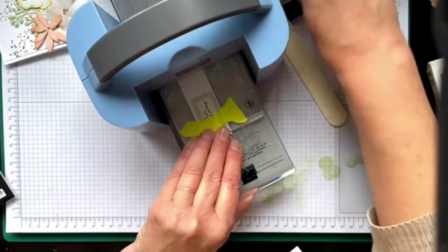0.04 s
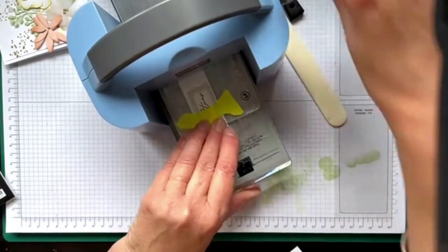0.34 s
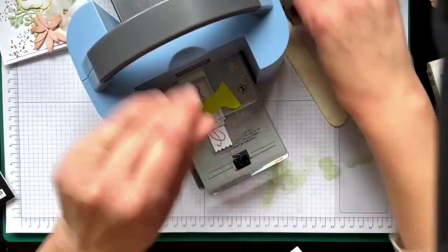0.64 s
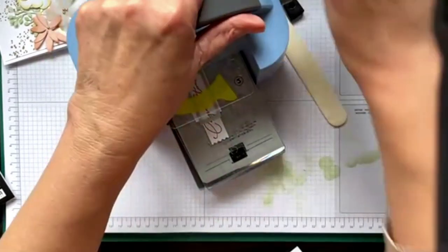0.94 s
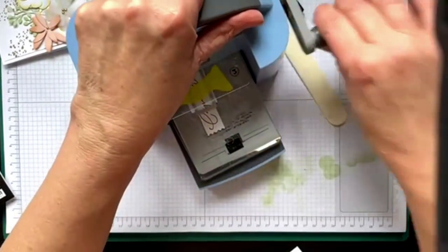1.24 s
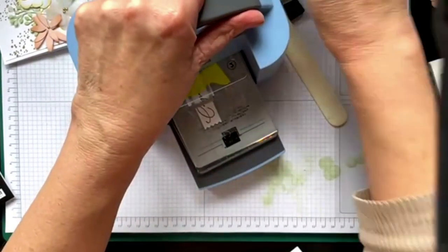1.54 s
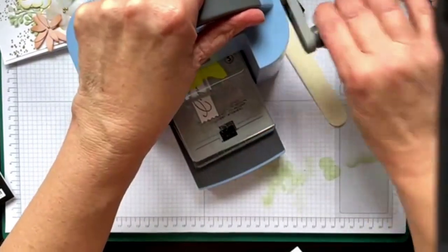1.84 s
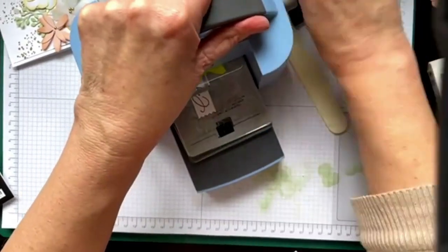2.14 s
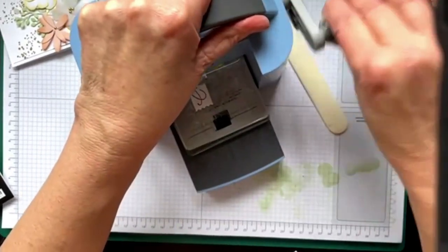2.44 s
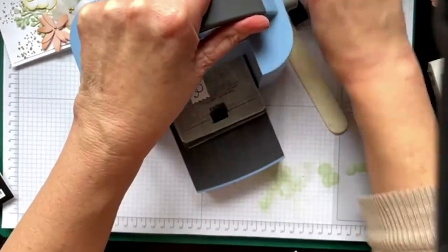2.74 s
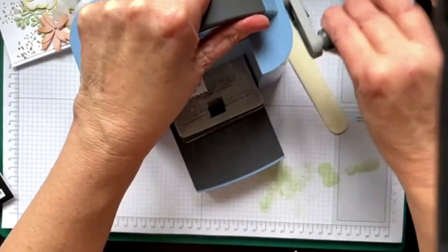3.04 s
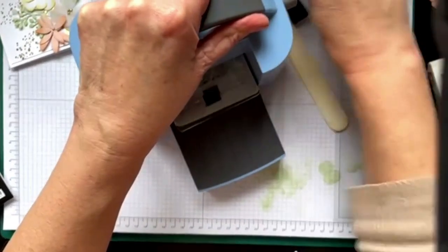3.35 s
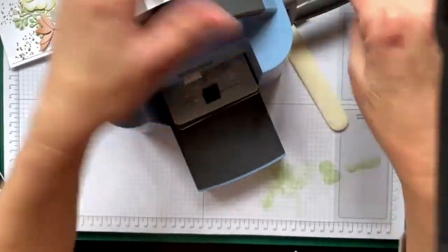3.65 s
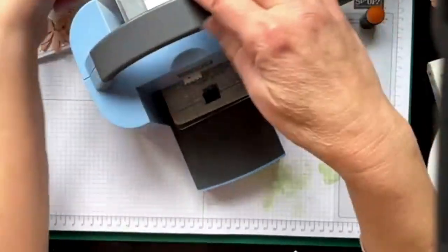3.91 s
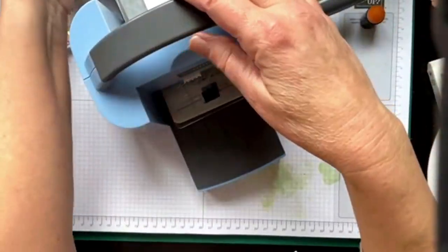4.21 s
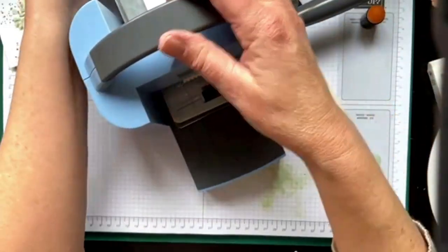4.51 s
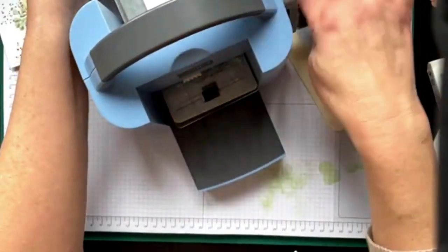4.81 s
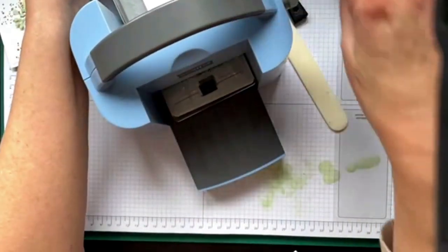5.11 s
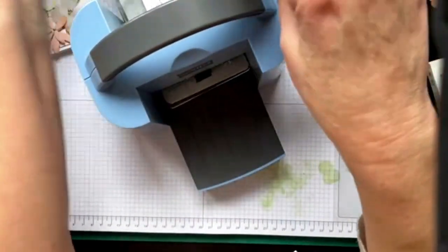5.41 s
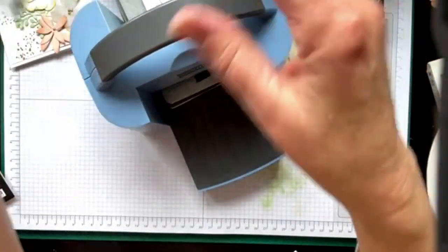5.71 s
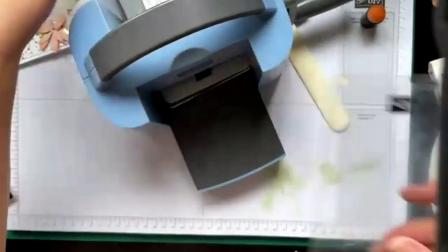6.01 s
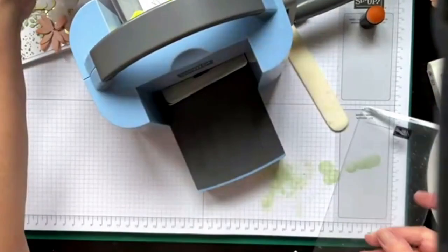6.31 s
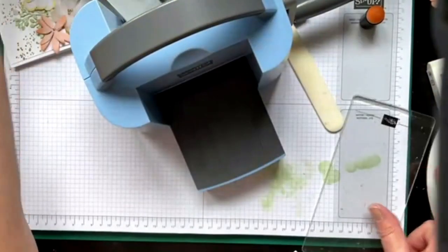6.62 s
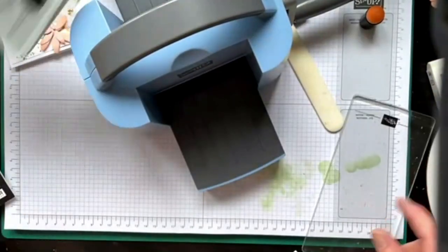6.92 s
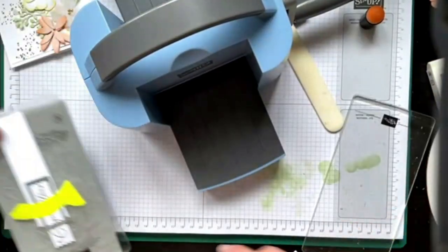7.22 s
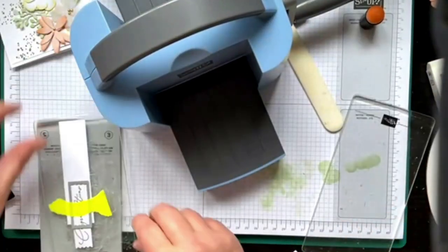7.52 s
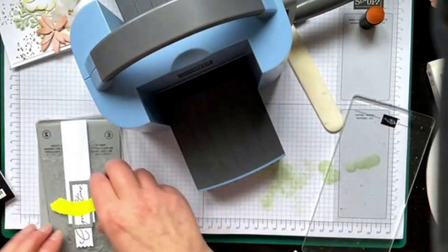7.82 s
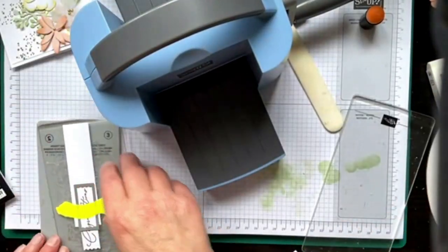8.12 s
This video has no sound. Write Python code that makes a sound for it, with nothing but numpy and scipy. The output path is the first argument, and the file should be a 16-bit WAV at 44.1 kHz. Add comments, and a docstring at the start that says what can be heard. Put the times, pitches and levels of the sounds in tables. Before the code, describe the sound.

Low grinding and knocking from a hand-turned die cutter ends in a loud clack, followed by plastic plates rattling, sliding and dropping close by.

```python
"""Low lurches, a clicking crank and knocking gears: a hand-cranked die-cutter grinds a plate sandwich
through its rollers on a craft table. The rollers snap shut behind it, a steel die ticks, and the loose
plates rattle out of the slot. A clear plate is slid onto the mat and the base plate dropped beside it.
Each blow is a crack plus the struck object's modes; the friction is mostly a stream of tiny slips.
Heard in a small room, close up, on a near-mono microphone."""
import sys
import numpy as np
from scipy import signal
from scipy.fft import rfft, irfft, next_fast_len
from scipy.io import wavfile
from scipy.ndimage import uniform_filter1d, map_coordinates

SR = 44100
rng = np.random.default_rng(int(sys.argv[2]) if len(sys.argv) > 2 else 0)


def log_audio(samples):
    """Write samples as a 16-bit WAV file to the path given in sys.argv[1]."""
    # one column per channel
    frames = np.atleast_2d(samples).T
    # limit to full scale, then quantise
    limited = np.clip(frames, -1, 1)
    pcm = np.round(limited * 32767).astype(np.int16)
    wavfile.write(sys.argv[1], SR, pcm)


N = 359591
TIME = np.arange(N) / SR
RING_TIME = np.arange(SR // 5) / SR

# Modes of the machine's housing and of the clear plate: f/Hz, level/dB, t60/s
HOUSING_MODES = [(184.6, -13, 0.1), (476.8, -12.5, 0.045), (544, -13.5, 0.11), (672, -11, 0.2),
                 (800, -11.5, 0.13), (1420, -7, 0.1), (1640, -13.5, 0.057), (2350, -18, 0.061),
                 (4465, -12.5, 0.048)]
CLEAR_PLATE_MODES = [(655, -4, 0.062), (713, -26, .15), (1017, -5, 0.082), (1246, -3.5, 0.088),
                     (1987, -8, 0.088), (4320, -18.5, 0.11)]
# Spectrum of gear teeth in contact: f/Hz, level/dB
GEAR_SPECTRUM = [(76, -30), (130, -8), (344, -12), (512, -2), (967, -10.5), (1250, -6), (2180, -11),
                 (2610, -8.5), (3250, -20.5), (6260, -19.5), (15000, -44)]


def amp(db):
    """Decibels to gain."""
    return 10 ** (np.asarray(db) / 20)


def unit(x):
    """x at rms 1."""
    return x / np.sqrt(np.mean(x ** 2) + 1e-20)


def onset_unit(x):
    """x with rms 1 over its first 8 ms."""
    return x / np.sqrt(np.mean(x[:SR // 125] ** 2))


def along(points, hz):
    """A curve of (f/Hz, value) points, read on a log frequency axis."""
    knot_hz, values = np.transpose(points)
    return np.interp(np.log(hz + 1), np.log(knot_hz + 1), values)


def wobble(knots_per_s):
    """A smooth random curve."""
    knots = rng.standard_normal(int(N * knots_per_s / SR) + 4)
    return map_coordinates(knots, [TIME * knots_per_s])


def fade(t60, t=RING_TIME):
    """Exponential decay, 60 dB down after t60 seconds."""
    return amp(-60 * t / t60)


def add(track, s, sound):
    """Mix a sound into the track from second s."""
    part = track[max(round(s * SR), 0):][:len(sound)]
    part += sound[:len(part)]


def coloured(x, colour=((1, 0),), tilt_db=0):
    """x through a causal filter: a spectrum, tilted by tilt_db per octave about 2 kHz."""
    size = 2 * next_fast_len(len(x) // 2 + 2048)
    hz = np.fft.rfftfreq(size, 1 / SR)
    db = along(colour, hz) + tilt_db * np.log2(np.clip(hz, 400, 10000) / 2000)
    cepstrum = irfft(np.log(np.maximum(amp(db), 1e-6)))
    cepstrum[1:size // 2] *= 2  # folded for minimum phase
    cepstrum[size // 2 + 1:] = 0
    return irfft(rfft(x, size) * np.exp(rfft(cepstrum)))[:len(x)]


def noise(colour):
    """Coloured noise of rms 1."""
    return unit(coloured(rng.standard_normal(N), colour))


def patchy(x, depth_db):
    """x with its colour drifting in small patches of time and frequency; rms 1."""
    spectra = signal.stft(x, nperseg=512)[2]
    patches = uniform_filter1d(rng.standard_normal(spectra.shape), size=7, axis=0)
    patches = uniform_filter1d(patches, size=12, axis=1)
    return unit(signal.istft(spectra * amp(depth_db * unit(patches)), nperseg=512)[1][:N])


def grains(per_s, spread_db, t60):
    """Tiny slips at random moments, of uneven size, each a short burst; rms 1."""
    slips = (rng.random(N) < per_s / SR) * amp(spread_db * (2 * rng.random(N) - 1))
    power = np.abs(signal.fftconvolve(slips ** 2, fade(t60) ** 2)[:N])
    return unit(np.sqrt(power) * rng.standard_normal(N))


def ring(modes, t=RING_TIME):
    """Damped modes, each struck with a new strength and sign."""
    hz, db, t60 = np.transpose(modes)[:, :, None]
    strength = amp(db + 2 * rng.standard_normal(hz.shape)) * rng.choice([-1, 1], hz.shape)
    return np.sum(strength * np.sin(2 * np.pi * hz * t) * fade(t60, t), axis=0)


def spot_colour(colour, depth_db):
    """Each contact point favours other parts of the body's spectrum."""
    hz = np.geomspace(60, 16000, 48)
    return np.column_stack([hz, along(colour, hz) + depth_db * rng.standard_normal(len(hz))])


def blows(rows, colour, modes, crack_t60, body_db, body_t60, ring_db, settle_t60):
    """Each blow: a crack, a duller dense ring of the whole body, and its few clear modes."""
    track = np.zeros(N)
    for s, db, tilt_db in rows:
        crack, body = rng.standard_normal((2, len(RING_TIME)))
        body = unit(signal.lfilter([1], [1, -0.3], body))
        burst = crack * fade(crack_t60) + amp(body_db) * body * fade(body_t60)
        contact = onset_unit(coloured(burst, spot_colour(colour, depth_db=2.5)))
        # light touches build up more slowly than hard ones
        onset = 1 - fade(settle_t60 * amp(-(db + 40) / 2))
        sound = (contact + amp(ring_db) * ring(modes)) * onset
        add(track, s, amp(db) * onset_unit(coloured(sound, tilt_db=tilt_db)))
    return track


def booms(rows, modes, rise_s):
    """Low modes that swell softly after each push."""
    t = np.arange(SR // 2) / SR
    track = np.zeros(N)
    for s, db in rows:
        boom = ring(modes, t) * (1 - fade(rise_s, t)) ** 2
        add(track, s - 0.005, amp(db) * boom / np.abs(boom).max())
    return track


def strokes(rows, friction):
    """Swells of a friction sound, each with its own length, level and brightness."""
    track = np.zeros(N)
    for s, length, db, tilt_db in rows:
        shape = np.hanning(round(2 * length * SR)) ** 2
        stroke = friction[round((s - length) * SR):][:len(shape)]
        add(track, s - length, amp(db) * shape * unit(coloured(stroke, tilt_db=tilt_db)))
    return track


def crank_arm(lag_s=0, turns_hz=2.2, farthest_out_s=0.55):
    """Position of the cranking arm, swinging between 1 and -1 once a turn."""
    return np.cos(2 * np.pi * turns_hz * (TIME - farthest_out_s - lag_s))


def loaded(release_s=3.17, let_go_s=0.044):
    """1 while the plates are between the rollers, 0 once they are through."""
    return np.clip((release_s - TIME) / let_go_s + 1, 0, 1)


def room_tone():
    """Still room air and mains hum."""
    # Hum partials and the spectrum of the air: f/Hz, level/dB
    partials = [(50, -67.5), (100, -66), (150, -78.5), (200, -78.5), (300, -84)]
    air = [(25, -6), (60, -11), (130, -12.5), (300, -18), (900, -22.5), (2000, -24.5), (4000, -32),
           (15000, -34), (16400, -42)]
    hum = sum(amp(db) * np.sqrt(2) * np.sin(2 * np.pi * (hz * TIME + rng.random()))
              for hz, db in partials)
    return hum + amp(-68.5) * noise(air)


def lurches():
    """The machine rocks on its feet each time the rollers catch."""
    catches = [(0.0, -37.5), (0.215, -35.5), (0.49, -47), (0.794, -37.5), (0.94, -37), (1.245, -40.5),
               (1.43, -42.5), (1.795, -38), (2.114, -38), (2.545, -42), (2.98, -43.5)]  # t/s, peak level/dB
    rocking = [(50.7, -8, 0.35), (84.3, -2.5, 0.37)]  # f/Hz, level/dB, t60/s
    return booms(catches, rocking, rise_s=0.023)


def rollers(bite_db=7.5, bite_s=0.361, swing_db=-1.46, spin_peak_s=5.1):
    """The rollers rumble, creak and grind in small slips under load, then spin on empty and duller."""
    # Spectra of the loaded rollers: f/Hz, level/dB
    grind = [(82, -33.5), (140, -3), (316, 1.5), (353, -9), (468, 5), (820, -4), (1150, -10.5),
             (1680, -16.5), (1820, -8), (4000, -28), (5200, -47), (8800, -120)]
    rumble = [(13, -33), (22, -13.5), (75, 4.5), (91, 1.5), (113, -17), (170, -17), (220, -43.5),
              (370, -120)]
    slips = patchy(coloured(grains(per_s=270, spread_db=2, t60=0.05), grind), depth_db=2.5)
    creaks = coloured(grains(per_s=22, spread_db=2, t60=0.06), GEAR_SPECTRUM, tilt_db=-3)
    creaks = patchy(creaks, depth_db=3.5)
    pressing = amp(-53.5) * noise(rumble) + amp(-59.5) * slips + amp(-62) * creaks
    strain_db = bite_db * np.exp(-TIME / bite_s) + swing_db * crank_arm()
    idle = unit(coloured(slips, [(300, -1), (600, -3.5), (1200, -9), (3500, -0.5)]))
    # spinning up at 73 dB/s, running down at 37 dB/s
    coast_db = -47.5 - np.maximum(73 * (spin_peak_s - TIME), 37 * (TIME - spin_peak_s))
    return loaded() * amp(strain_db) * pressing + amp(coast_db) * idle


def cranking_hiss(echo_ms=0.335, swing=0.056, waver=0.015, echo_share=0.2, swell_db=1.3):
    """A patchy friction hiss that swells once a turn, combed by its reflection off the circling arm."""
    spectrum = [(1060, -27.5), (1800, -4.5), (3160, -12.5), (5980, -6), (7390, -15), (11900, -11.5),
                (15200, -29), (16400, -37)]  # f/Hz, level/dB
    direct = noise(spectrum)
    delay_s = echo_ms / 1000 * (1 - swing * crank_arm() + waver * wobble(7))
    combed = direct + echo_share * map_coordinates(direct, [(TIME - delay_s) * SR])
    level_db = -63 + swell_db * crank_arm(lag_s=0.14) + 0.9 * wobble(11)
    return amp(level_db) * loaded() * patchy(combed, depth_db=2.5)


def crank_clicks():
    """The crank makes small hard contacts in its socket."""
    clicks = [(0.2305, -35, 0.5), (0.2668, -24.5, 1.7), (0.299, -42, -4), (0.4635, -47, -2.5)]  # t/s, level/dB, tilt/(dB/octave)
    spectrum = [(88, -39), (150, 0), (348, -20), (662, 3.5), (837, -14), (2270, 7.5), (2980, -13),
                (5150, -4), (5910, -28), (7180, -4.5), (11500, -43.5), (16000, -58.5)]  # f/Hz, level/dB
    modes = [(1100, -13.5, 0.078), (2260, -10, 0.016), (2530, -5.5, .025), (4000, -18, 0.026),
             (5180, 9, 0.0073), (7300, -24, 0.014)]  # f/Hz, level/dB, t60/s
    return blows(clicks, spectrum, modes, crack_t60=0.01,
                 body_db=-18.5, body_t60=0.043, ring_db=4.5, settle_t60=0.002)


def gear_knocks():
    """Gear teeth take up their play and ring the housing."""
    knocks = [(0.358, -38.5, -4), (0.425, -48, 1), (0.619, -42.5, 5.5), (0.63, -41.5, -6),
              (0.872, -47.5, -3.5), (0.905, -45.5, -6), (0.961, -41.5, 1.4), (1.034, -46, -8.5),
              (1.346, -51, -1.5), (1.425, -45.5, -7), (1.603, -48.5, -3.5), (1.647, -55.5, -6),
              (1.666, -45, -2), (2.235, -43.5, -5), (2.263, -43, -6), (2.391, -47, -1.8), (3.521, -42, 0.7),
              (3.839, -48, 0), (8.025, -49.5, -10)]  # t/s, level/dB, tilt/(dB/octave)
    return blows(knocks, GEAR_SPECTRUM, HOUSING_MODES, crack_t60=0.035,
                 body_db=-14.5, body_t60=0.094, ring_db=-1.5, settle_t60=0.0015)


def squeaks(width_hz=130):
    """The pressed plates stick briefly under the roller: faint, fuzzy, narrow tones."""
    sticks = [(0.533, 0.087, 2740, -64), (1.02, 0.13, 2590, -62.5), (1.405, 0.075, 2220, -61.5),
              (2.083, .1, 2840, -65)]  # t/s, length/s, f/Hz, level/dB
    fuzz = wobble(2 * width_hz)
    track = np.zeros(N)
    for s, length, hz, db in sticks:
        swell = np.exp(-np.pi * np.minimum(((TIME - s) / length) ** 2, 10))
        track += amp(db) * swell * unit(fuzz * np.sin(2 * np.pi * hz * TIME))
    return track


def rubs():
    """Skin and plastic brush over the housing in short grainy swells."""
    brushes = [(0.61, 0.052, -45, -4.5), (1.847, 0.1, -40.5, -0.5), (2.138, 0.057, -52, 4.5),
               (3.525, 0.099, -49.5, 2), (3.757, 0.041, -55.5, 0), (3.835, 0.065, -51.5, -0.5),
               (4.299, 0.17, -61, 3), (4.468, .09, -67, 10), (4.95, .16, -49, 1.5), (5.09, 0.17, -44.5, -1),
               (5.49, 0.084, -52, -8), (5.754, 0.04, -55.5, 3.5), (6.89, 0.077, -73, 8),
               (7.809, 0.059, -61.5, 0.5), (8.1, 0.049, -59, 3)]  # t/s, length/s, level/dB, tilt/(dB/octave)
    spectrum = [(120, -30), (200, -9.5), (551, -2.5), (796, -4), (1150, -0.5), (1630, -12.5), (2590, -9.5),
                (3350, -17), (13100, -26), (16400, -53)]  # f/Hz, level/dB
    friction = coloured(grains(per_s=880, spread_db=3, t60=0.023), spectrum)
    return strokes(brushes, patchy(friction, depth_db=4.5))


def roller_snap():
    """The rollers slam shut as the plates leave them, ringing the housing."""
    slams = [(3.1665, -26.5, 2.5), (3.172, -15.5, 1), (3.178, -34.5, 4), (3.193, -24, 0.45), (3.208, -9, 1),
             (3.2145, -19, 7), (3.2215, -19, 3.5), (3.227, -26.5, 2.5), (3.264, -34.5, 7.5),
             (3.279, -32.5, 1)]  # t/s, level/dB, tilt/(dB/octave)
    spectrum = [(65, -41.5), (110, -12), (186, -7.5), (403, -7.5), (665, 3), (950, -10.5), (1410, -5),
                (1850, -12), (2540, -10.5), (3260, -17.5), (4370, -16.5), (7230, -25.5), (12200, -26),
                (16400, -33)]  # f/Hz, level/dB
    return blows(slams, spectrum, HOUSING_MODES, crack_t60=0.024,
                 body_db=-11, body_t60=0.12, ring_db=-5, settle_t60=0.01)


def table_thumps():
    """The table top booms under each weight that lands on it."""
    landings = [(3.211, -22), (3.854, -40.5), (4.036, -41), (4.351, -46.5), (4.786, -34), (5.159, -33.5),
                (5.452, -37.5), (5.741, -47.5), (6.272, -39), (6.438, -34.5), (6.532, -41), (7.224, -29),
                (7.353, -36), (7.409, -31.5), (7.791, -51.5), (8.025, -51)]  # t/s, peak level/dB
    modes = [(48, -5, 0.52), (71.2, 3, 0.56), (81, -3, 0.47), (106, -19, 0.16)]  # f/Hz, level/dB, t60/s
    return booms(landings, modes, rise_s=0.099)


def die_ticks():
    """The steel die springs free with a short, high ring."""
    ticks = [(3.375, -21.5, 0.74), (3.391, -30.5, -5), (3.4188, -38.5, -2.5), (3.479, -49, -6.5)]  # t/s, level/dB, tilt/(dB/octave)
    spectrum = [(180, -26), (300, -16), (614, -12), (801, -16.5), (2570, -1), (3350, -10), (4670, 4),
                (6620, -25.5), (8500, -11), (16000, -32.5)]  # f/Hz, level/dB
    modes = [(2087, -11, 0.055), (2610, -5, 0.022), (4400, -7, .015), (6070, -6, 0.016), (8500, 1.5, 0.021),
             (11724, 3, 0.015)]  # f/Hz, level/dB, t60/s
    return blows(ticks, spectrum, modes, crack_t60=0.0095,
                 body_db=-29.5, body_t60=0.055, ring_db=3.5, settle_t60=0.003038)


def slot_rattle():
    """The loose plates knock about in the slot."""
    knocks = [(4.033, -29, 1.5), (4.435, -43, -5.5), (4.766, -44, -2), (4.796, -32, 1), (4.95, -33.5, 0),
              (4.961, -35, -1.5), (4.972, -38, 0.1), (5.0186, -35.5, 1), (5.03, -42.5, 12),
              (5.0576, -24, 2), (5.11, -39, -1.7), (5.144, -23, 4.5), (5.149, -34.5, 7),
              (5.154, -20.5, 7.5), (5.162, -22, 1), (5.198, -27.5, 5), (5.295, -42, 1.5), (5.386, -43, 0.2),
              (5.451, -48, -6), (5.65, -42, 3.5), (5.741, -53, -2.5)]  # t/s, level/dB, tilt/(dB/octave)
    spectrum = [(76, -49.5), (130, -7), (187, -22), (605, 1), (925, -8), (1250, -4.5), (1410, -1.5),
                (2390, -6), (4760, -5.5), (6850, -13), (8390, -17.5), (9860, -21.5), (11600, -20),
                (16400, -40.5)]  # f/Hz, level/dB
    modes = [(312.5, -23, 0.079), (585, -19.5, .1), (677, -13.5, 0.11), (1073, -14, 0.064),
             (1222, -6.5, 0.028), (1746, -14.5, 0.054), (4508, 1.5, 0.018), (5500, -2.5, 0.015),
             (8410, -13, 0.017), (11440, -12, 0.016)]  # f/Hz, level/dB, t60/s
    return blows(knocks, spectrum, modes, crack_t60=0.013,
                 body_db=-22, body_t60=0.084, ring_db=-1.5, settle_t60=0.028)


def clear_plate_taps():
    """The clear plate knocks as it comes free, and again as it is put down on the mat."""
    taps = [(5.168, -20.5, 3), (5.174, -28, -3), (5.207, -28, -9), (5.228, -45, 5), (6.2074, -38, 3),
            (6.229, -35.5, -2), (6.296, -35, -5.5), (6.317, -35, -3), (6.335, -31.5, 2), (6.383, -32, -6),
            (6.4, -30.5, -2.5), (6.4335, -22, 2), (6.444, -26.5, 4.5), (6.535, -37.5, 0.5)]  # t/s, level/dB, tilt/(dB/octave)
    spectrum = [(88, -101), (150, -27), (329, -12), (478, -15.5), (641, -1), (931, -14.5), (1270, 0),
                (1550, -17), (3900, -26.5), (4220, -21.5), (4840, -28.5), (12200, -35), (16400, -44.5)]  # f/Hz, level/dB
    return blows(taps, spectrum, CLEAR_PLATE_MODES, crack_t60=0.046,
                 body_db=-10.5, body_t60=0.15, ring_db=-1, settle_t60=0.0068)


def clear_plate_slide(ring_share=0.35):
    """The clear plate's edge scrapes on the mat and keeps its modes ringing."""
    pushes = [(6.135, 0.012, -53.5, -0.5), (6.177, 0.057, -47, 1), (6.32, 0.097, -46.5, -1.5),
              (6.405, 0.15, -49, 1.5), (6.495, 0.079, -38, -3), (6.555, 0.053, -41, -4.5),
              (6.612, 0.064, -40.5, 0), (6.645, 0.04, -46.5, -4)]  # t/s, length/s, level/dB, tilt/(dB/octave)
    spectrum = [(150, -56), (250, -37), (569, -20.5), (666, -0.5), (1110, -29), (1410, -6.5), (1740, -21.5),
                (2150, -10.5), (2700, -14), (4330, -13.5), (5150, -18.5), (14700, -29.5), (16400, -48)]  # f/Hz, level/dB
    slips = grains(per_s=600, spread_db=5.5, t60=0.032)
    ringing = unit(signal.fftconvolve(slips, ring(CLEAR_PLATE_MODES))[:N])
    scrape = patchy(coloured(slips, spectrum), depth_db=4.5)
    return strokes(pushes, scrape + ring_share * ringing)


def base_plate_drop():
    """The base plate clatters down on the mat."""
    impacts = [(7.218, -33.5, -11.5), (7.2436, -31, 3), (7.251, -42, 2.5), (7.353, -20, 0),
               (7.359, -22.5, 0), (7.37, -33, 10), (7.402, -30, 2.5), (7.409, -23, 2), (7.452, -32.5, -0.5),
               (7.4666, -27.5, 5), (7.475, -32.5, 0.3)]  # t/s, level/dB, tilt/(dB/octave)
    spectrum = [(59, -28), (100, -2), (156, -8.5), (323, -1), (682, -14.5), (791, -12), (1350, -12.5),
                (1600, -13.5), (1860, -13), (2970, -18.5), (11900, -20.5), (16400, -33)]  # f/Hz, level/dB
    modes = [(300, -9, 0.051), (363, -7, 0.075), (1135, -12.5, 0.16), (1305, -15, .14), (1640, -23, 0.068),
             (1897, -8, 0.1), (2670, -16, 0.2)]  # f/Hz, level/dB, t60/s
    return blows(impacts, spectrum, modes, crack_t60=0.035,
                 body_db=-10, body_t60=0.2, ring_db=-2, settle_t60=0.014)


def room(x):
    """The small room's tail, 5 ms behind the direct sound, its treble dying first."""
    decay = [(150, 0.23), (1000, 0.3), (5000, 0.2), (14000, 0.057)]  # f/Hz, t60/s
    hz, t, spectra = signal.stft(rng.standard_normal(SR // 2), SR, nperseg=256)
    tail = signal.istft(spectra * fade(along(decay, hz)[:, None], t), SR, nperseg=256)[1]
    delayed = np.pad(x, (SR // 200, 0))
    return signal.fftconvolve(delayed, tail / np.linalg.norm(tail))[:N]


def scene():
    """Everything sits close and central; only the treble of the plates' room tail has some width."""
    machine = gear_knocks() + roller_snap() + slot_rattle() + rubs()
    ticks = crank_clicks() + die_ticks()
    plates = clear_plate_taps() + base_plate_drop() + clear_plate_slide()
    echo = room(amp(-15) * machine + amp(-18.5) * ticks + amp(-16) * plates)
    running = table_thumps() + lurches() + rollers() + cranking_hiss() + squeaks()
    mid = machine + ticks + plates + echo + running + room_tone()
    side = amp(-12) * coloured(room(plates), [(2500, -60), (5000, 0), (9000, 2), (15000, -4)])
    return np.array([mid + side, mid - side])


def record(dry):
    """The recorder clips at full scale and falls off steeply at its band limit."""
    top_hz = 15850
    size = next_fast_len(N + SR // 2)
    lowpass = 1 / np.sqrt(1 + (np.fft.rfftfreq(size, 1 / SR) / top_hz) ** 240)
    return irfft(rfft(np.clip(dry, -1, 1), size) * lowpass, size)[:, :N]


dry = scene()
out = record(dry)
log_audio(out)
```